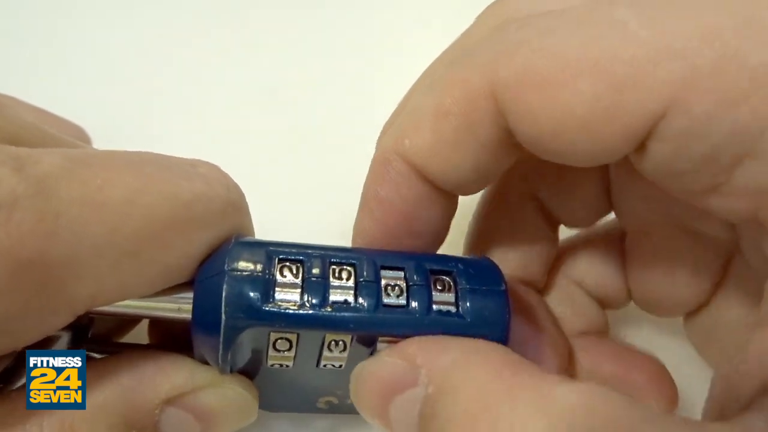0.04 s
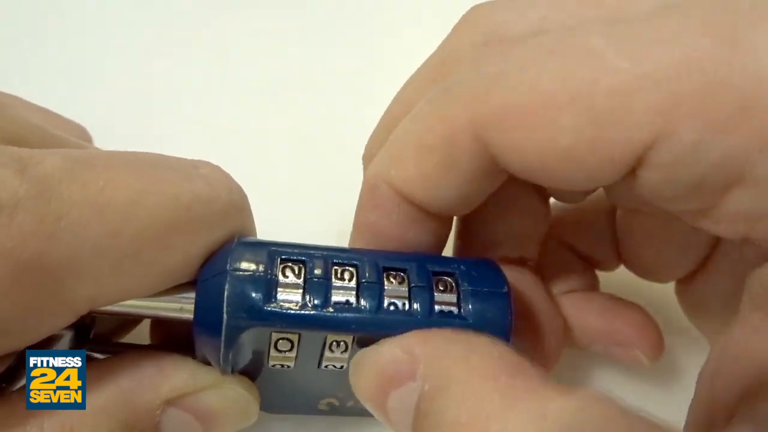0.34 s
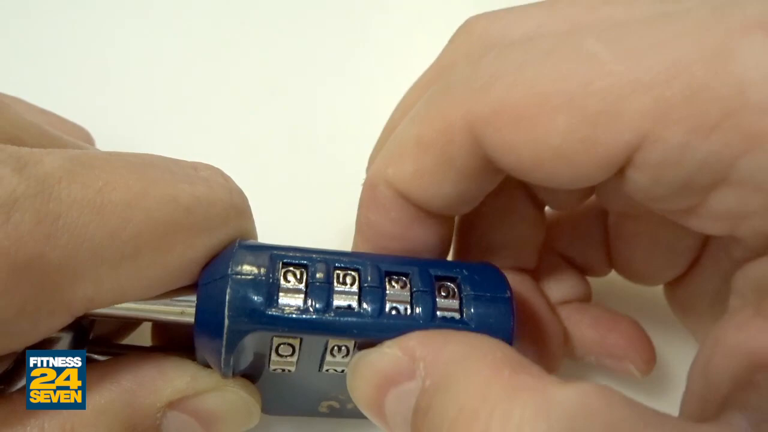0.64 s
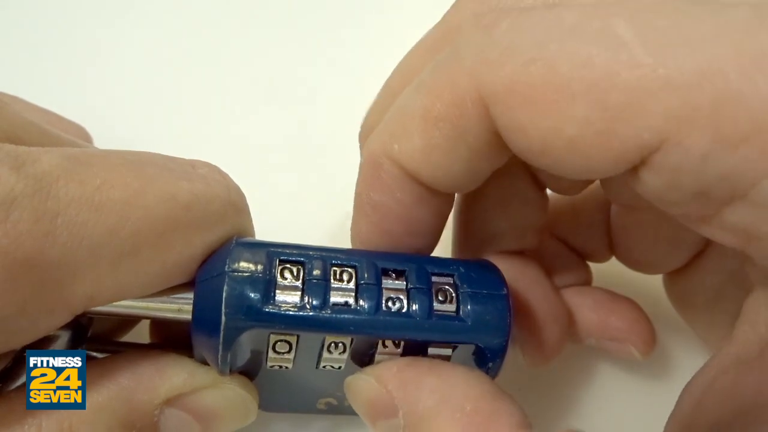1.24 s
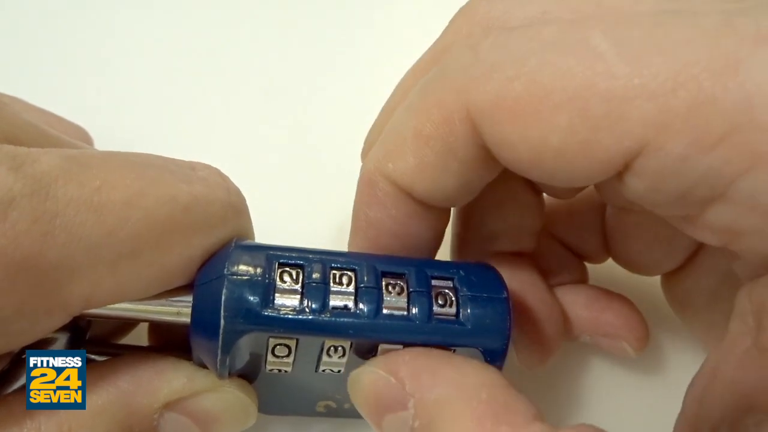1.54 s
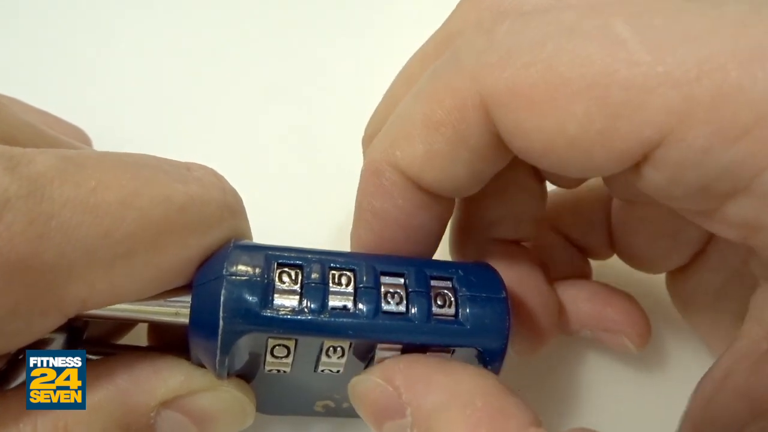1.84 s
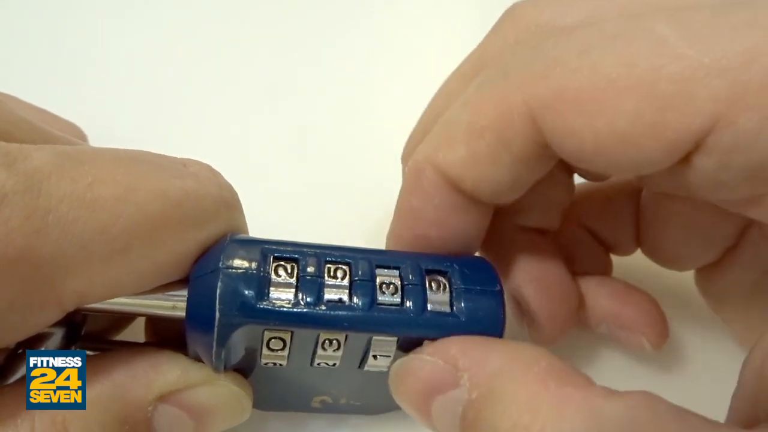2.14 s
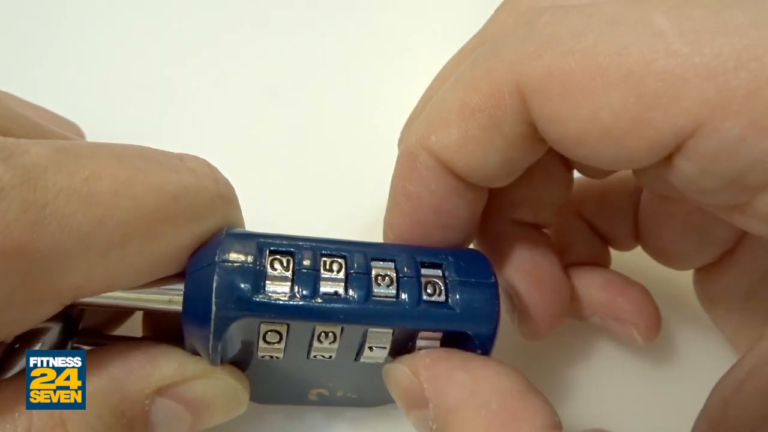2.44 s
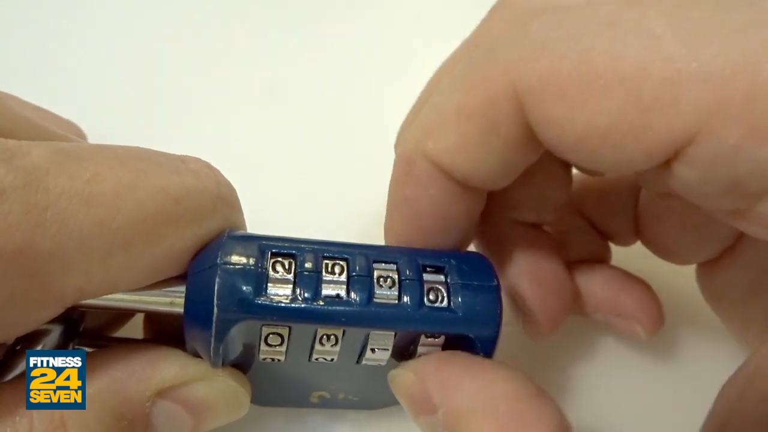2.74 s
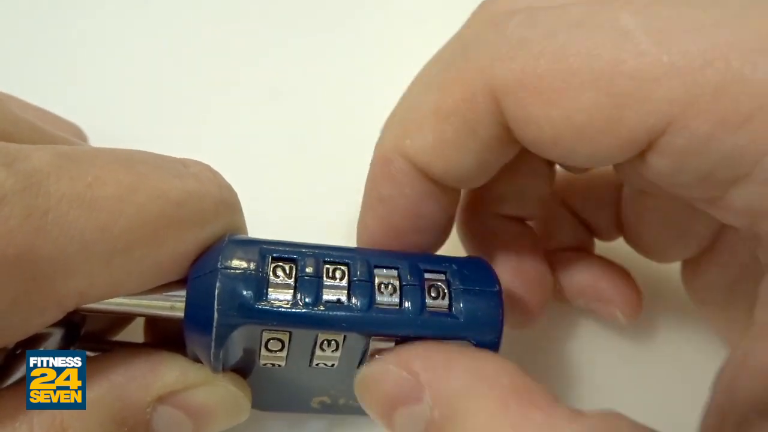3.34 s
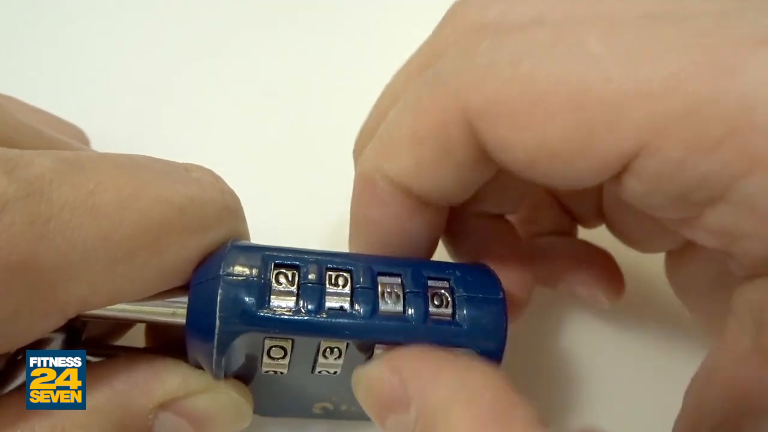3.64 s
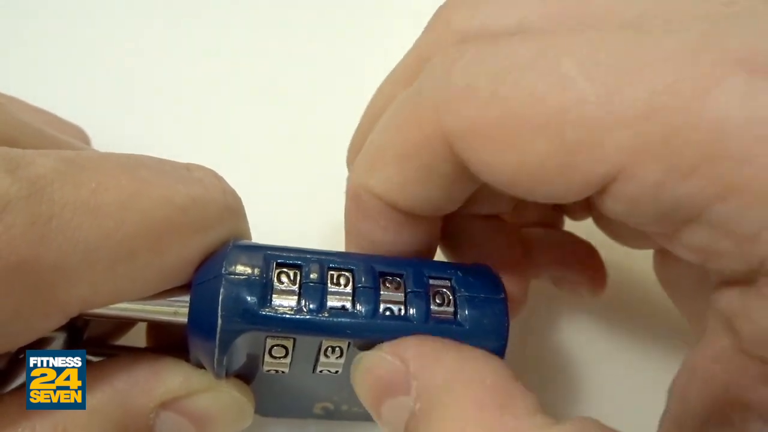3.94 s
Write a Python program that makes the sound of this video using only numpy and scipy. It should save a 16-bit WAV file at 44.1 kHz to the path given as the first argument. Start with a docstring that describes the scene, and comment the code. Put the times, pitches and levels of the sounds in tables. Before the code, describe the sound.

A small padlock's number wheels click sharply and irregularly over a quiet fan hum.

```python
"""In a small room with a quietly humming fan, a thumb turns the number wheels of a small padlock, close up.
The detent springs scrape and snap from notch to notch, each snap a short crack with a faint metal ring.
The firmer snaps knock the hand-damped lock body, and wheels and loose parts tap and ping as they touch.
A near wall answers with a dull slap, the room with a soft tail."""
import sys
import numpy as np
from scipy import signal
from scipy.fft import rfft, irfft, next_fast_len
from scipy.io import wavfile
from scipy.ndimage import map_coordinates

SR = 44100
rng = np.random.default_rng(int(sys.argv[2]) if len(sys.argv) > 2 else 0)


def int16_out(signal):
    """Quantize to a 16-bit WAV file."""
    q = np.round(np.clip(np.atleast_2d(signal).T, -1, 1) * 32767)
    wavfile.write(sys.argv[1], SR, q.astype(np.int16))


N = 176400
ATTACK_S = .0006  # onset time constant of every crack and ring

# The detent contacts. Each row: start in seconds, then the crack's relative level in dB in its
# mid, presence and top bands.
DETENT_SNAPS = [(0.0436, -61, -83, -52.5), (0.2698, -52.5, -72, -65), (0.4335, -60, -52, -65),
                (0.4553, -50.5, -66, -53), (0.4617, -49, -54, -50), (0.468, -45, -55, -41.5),
                (0.6242, -55, -54.5, -54), (0.6442, -54, -66, -57), (0.6634, -49.5, -61, -48),
                (0.6728, -44, -50, -44.5), (0.6781, -45, -52, -47.5), (0.82, -53, -57, -56),
                (0.8316, -47, -51, -46.5), (0.8374, -44.5, -49, -38), (1.0126, -56, -69, -49.5),
                (1.0289, -47.5, -52, -55), (1.0392, -47, -45, -42.5), (1.1928, -47, -44.5, -39.5),
                (1.2334, -54, -48, -48), (1.2340, -40.5, -37.5, -29.5), (1.237, -47.5, -55, -49),
                (1.3312, -49, -40.5, -39.5), (1.3510, -43.5, -43, -36.5), (1.3548, -63, -64, -33.5),
                (1.3614, -39.5, -59, -61), (1.367, -58, -56, -63), (1.3805, -45, -40, -45.5),
                (1.5678, -51.5, -57.5, -57), (1.7499, -53.5, -57, -52), (1.8372, -48.5, -56, -46),
                (1.9932, -64, -55, -44.5), (2.2162, -46.5, -46, -44), (2.379, -57, -54, -79),
                (2.3984, -41.5, -42.5, -41), (2.3996, -47, -47, -53), (2.583, -55, -56, -56),
                (2.599, -44, -50, -52), (2.6024, -45.5, -70, -48), (2.768, -36.5, -48, -45),
                (2.7705, -52, -56, -47), (2.812, -67, -50, -49), (2.821, -67, -46.5, -55),
                (2.8946, -53, -56, -76.0), (2.9192, -47.5, -45, -43), (2.922, -45.5, -62, -50.5),
                (2.9508, -46.5, -45, -44), (2.9607, -59, -73, -53), (3.1126, -54, -57, -70),
                (3.1476, -48, -65, -57), (3.1505, -46, -51, -46.5), (3.423, -56, -62, -67),
                (3.5316, -43.5, -46.5, -50), (3.6871, -52, -58, -66), (3.7139, -43, -52, -37.5),
                (3.7167, -43.5, -48, -43.5), (3.8754, -53, -65, -53), (3.9137, -46.5, -45, -42.5)]
# The lock body jolts as a wheel seats. Each row: start in seconds, relative level in dB, pitch in Hz.
BODY_KNOCKS = [(0.465, -38.5, 262), (0.6758, -41.5, 330), (0.708, -46.5, 207), (0.8379, -31, 378),
               (1.0262, -38.5, 316), (1.037, -42.5, 330), (1.188, -38, 290), (1.193, -34.5, 410),
               (1.2027, -35.5, 308), (1.2351, -36.5, 380), (1.3509, -36, 397), (1.3606, -33, 252),
               (1.8385, -46.5, 328), (1.9933, -42, 248), (2.218, -30.5, 293), (2.398, -30.5, 380),
               (2.6008, -39.5, 346), (2.7676, -29.5, 372), (2.8205, -38.5, 300.0), (2.9014, -40, 340),
               (2.9188, -39.5, 218), (2.9536, -39.5, 165), (3.0395, -38.5, 270), (3.148, -35, 297),
               (3.5318, -40.5, 270), (3.7145, -34.5, 324), (3.9251, -45, 261)]
# The dull colour of thumb friction. Each row: frequency in Hz, relative level in dB.
FRICTION_EQ = [(40, -26), (170, 4.5), (350, 4.5), (700, -13), (2200, -16.5), (4000, -40), (12000, -36)]


def amp(db):
    return 10 ** (np.asarray(db) / 20)


def unit_rms(x):
    return x / np.sqrt(np.mean(x ** 2) + 1e-20)


def curve_at(points, hz, column=1):
    """One column of a table read on a log frequency axis."""
    columns = np.transpose(points)
    return np.interp(np.log(hz + 1), np.log(columns[0] + 1), columns[column])


def fader(points):
    """Gain per sample from points of time in seconds and level in dB."""
    return amp(np.interp(np.arange(N) / SR, *np.transpose(points)))


def wobble(knots_per_s):
    """A smooth random curve."""
    return map_coordinates(rng.standard_normal(4096), [np.arange(N) * knots_per_s / SR], mode="wrap")


def filtered(x, response):
    """Shape x with a gain given as a function of frequency."""
    size = next_fast_len(N + SR // 2)
    return irfft(rfft(x, size) * response(np.fft.rfftfreq(size, 1 / SR)), size)[:N]


def noise(eq):
    """Coloured noise of rms 1."""
    return unit_rms(filtered(rng.standard_normal(N), lambda hz: amp(curve_at(eq, hz))))


def add(track, start_s, sound):
    """Mix a sound into the track."""
    part = track[max(round(start_s * SR), 0):][:len(sound)]
    part += sound[:len(part)]


def wavering_tone(hz, width_hz):
    """A tone of rms 1, unsteady in pitch and level."""
    drift = np.cumsum(wobble(2 * width_hz)) * width_hz / 2
    phase = 2 * np.pi * (hz * np.arange(N) + drift) / SR
    return unit_rms(amp(1.12 * wobble(width_hz)) * np.sin(phase))


def jolt(hz, cycles_to_crest):
    """A heavily damped swing whose envelope crests at 1."""
    t = np.arange(SR // 12) / SR
    rise = t * hz / cycles_to_crest
    return -rise * np.exp(1 - rise) * np.sin(2 * np.pi * hz * t)


def ring(hz, t60, drift_rad):
    """A dying tone, roughened by a phase that wanders about drift_rad as it fades."""
    t = np.arange(SR // 2) / SR
    drift = np.cumsum(rng.standard_normal(len(t))) * drift_rad / np.sqrt(t60 * SR)
    envelope = amp(-60 * t / t60) * (1 - np.exp(-t / ATTACK_S))
    return envelope * np.sin(2 * np.pi * hz * t + drift)


def burst(t60, lead_s):
    """A brief rough impact, starting lead_s into the array."""
    t = np.maximum(np.arange(SR // 25) / SR - lead_s, 0)
    spectrum = rfft(rng.standard_normal(len(t)) * (1 - np.exp(-t / ATTACK_S)) * amp(-60 * t / t60))
    return irfft(spectrum / (np.abs(spectrum) + 1e-12) ** .18)  # evens out peaks and dips a little


def fan():
    """The bed: steady moving air, a few humming tones and a low drone that swells and fades."""
    # Fan and room air. Each row: frequency in Hz, relative level in dB.
    air_eq = [(20, -20.5), (50, -16.5), (90, -11.5), (135, -10), (170, -9), (210, -3.5), (245, -9.5),
              (275, -1), (350, -11), (420, -15.5), (590, -19), (830, -18.5), (1000, -26), (1300, -28),
              (1650, -24.5), (2350, -23.5), (2700, -30.5), (6000, -33), (11000, -37)]
    # Fan tones and duct resonances. Each row: pitch in Hz, level in dB before the fader, width in Hz.
    hum_tones = [(374.2, -64, 18), (736, -74.5, 10), (791.4, -65.5, 6)]
    # The fader ride on those tones. Each row: time in seconds, gain in dB.
    hum_ride = [(0, -4), (.55, -0.5), (2.6, -0.5), (3.2, 2.5), (4, 2.5)]
    # The swells of the drone. Each row: time in seconds, rms level in dB.
    drone_ride = [(0, -60.5), (.2, -57), (.36, -48.5), (.41, -73), (0.518, -61), (.6, -69), (1.0, -58),
                  (1.5, -58), (2.4, -62), (2.7, -86), (3.3, -58.5), (4, -64)]
    hum = sum(amp(db) * wavering_tone(hz, width_hz) for hz, db, width_hz in hum_tones)
    air = amp(-56.5) * noise(air_eq)
    drone = fader(drone_ride) * wavering_tone(280.4, width_hz=12)
    return air + drone + fader(hum_ride) * hum


def room(x):
    """A dull slap from the near wall within a soft, diffuse room tail."""
    # The room's tail. Each row: frequency in Hz, level in dB, time to fall 60 dB in seconds.
    tail_bands = [(98, -12.5, 0.35), (332, -1.5, 0.53), (595, -10, 0.036), (1180, -9, 1),
                  (1870, -4.5, 0.19), (3500, -6, 0.72), (5900, -12, 0.36), (8200, -9.5, 0.49),
                  (12000, -12, 0.17)]
    slap_s, slap_cutoff_hz, predelay_s = .0137, 910, .006
    out = np.zeros(N)
    add(out, slap_s, amp(-9) * signal.lfilter(*signal.butter(1, slap_cutoff_hz, fs=SR), x))
    for piece in np.array_split(np.arange(N), 20):  # a fresh random tail every 0.2 s
        hz, t, hiss = signal.stft(rng.standard_normal(SR // 2), SR, nperseg=256)
        t60 = curve_at(tail_bands, hz, column=2)[:, None]
        decay = amp(curve_at(tail_bands, hz)[:, None] - 60 * t / t60)
        energy_trim = np.sqrt(2 * np.log(1000) / (t60 * SR))
        tail = signal.istft(hiss * decay * energy_trim, SR, nperseg=256)[1]
        add(out, piece[0] / SR + predelay_s, signal.fftconvolve(x[piece], tail))
    return out


def thumb_slide():
    """A soft, dull swell of skin sliding over to the next wheel."""
    crest_s, width_s = 3.34, 0.15
    swell = np.exp(-.5 * ((np.arange(N) / SR - crest_s) / width_s) ** 2)
    return amp(-58.5) * swell * noise(FRICTION_EQ)


def notch_scrapes():
    """The thumb's grainy rub swells as the spring climbs out of its notch, just before the wheel seats."""
    climb_s = 0.02
    swell = amp(-51) * np.linspace(0, 1, int(climb_s * SR))
    force = np.zeros(N)
    for start, _, _ in BODY_KNOCKS:
        add(force, start - climb_s, swell)
    return force * unit_rms(noise(FRICTION_EQ) * amp(2 * wobble(600)))


def contact_grit():
    """Tiny slips crowd around each detent contact in a bright, gritty fuzz."""
    # The colour of the grit. Each row: frequency in Hz, relative level in dB.
    grit_eq = [(300, -40), (1500, -15), (4000, -14), (7500, -13), (12000, -10)]
    t = np.arange(-SR // 50, SR // 50) / SR
    spike = np.exp(-np.abs(t) / 0.0045)
    force = np.zeros(N)
    for start, *band_dbs in DETENT_SNAPS:
        add(force, start + t[0], amp(np.mean(band_dbs) - 8.5) * spike)
    return force * unit_rms(noise(grit_eq) * amp(8 * wobble(1700)))


def body_knocks():
    """The lock body swings about twice; the hand under it gives with a lower thud."""
    # The thumb's push thuds through the hand as a wheel gives. Each row: start in seconds, level in dB.
    hand_thuds = [(0.467, -58), (0.678, -45), (0.836, -47), (1.04, -45), (1.19, -53), (1.232, -46.5),
                  (1.327, -46.5), (1.362, -47.5), (2.821, -53), (2.956, -56), (3.533, -50.5), (3.918, -44)]
    out = np.zeros(N)
    for start, db, hz in BODY_KNOCKS:
        add(out, start, amp(db + 1.5) * jolt(hz, cycles_to_crest=0.48))
    for start, db in hand_thuds:
        add(out, start, amp(db) * jolt(hz=109.8, cycles_to_crest=0.65))
    return out


def part_taps():
    """Wheels and loose parts touch, and each rings with one slightly rough tone."""
    # Hollow taps to bright pings. Each row: start in seconds, level in dB, pitch in Hz,
    # time to fall 60 dB in seconds.
    taps = [(0.4682, -27, 7700, 0.007), (0.6442, -39, 8900, 0.0085), (.7098, -37.5, 2100, 0.011),
            (0.8378, -24.5, 7700, 0.01), (0.837, -40, 640, 0.013), (1.2072, -30, 970, 0.02),
            (1.2078, -40.5, 1950, 0.015), (1.34, -38.5, 2030, 0.01), (1.3575, -34, 1620, 0.013),
            (1.3617, -22.5, 1900, 0.0077), (1.3619, -35, 2750, 0.0052), (1.75, -74, 3354, 1.8),
            (1.9933, -39.5, 7950, .009), (1.9935, -36.5, 8800, 0.01), (2.768, -27.5, 6250, 0.0079),
            (3.0398, -37.5, 640, 0.017), (3.9137, -44.5, 3360, 0.016)]
    out = np.zeros(N)
    for start, db, hz, t60 in taps:
        add(out, start, amp(db) * ring(hz, t60, drift_rad=1.6))
    return out


def wheel_resonance(x):
    """The wheel adds its bright resonance to every snap."""
    return x + amp(-1) * signal.lfilter(*signal.iirpeak(7670, Q=10, fs=SR), x)


def detent_snaps():
    """The spring snaps into a notch: a crack of a few milliseconds and a faint metallic ring."""
    # The crack's mid, presence and top bands. Each row: low edge in Hz, high edge in Hz,
    # time to fall 60 dB in seconds.
    crack_bands = [(810, 4610, 0.015), (4730, 6460, 0.0035), (6000, 12400, 0.011)]
    # The ring of wheels and springs. Each row: pitch in Hz, level in dB relative to the snap's
    # top-band setting, time to fall 60 dB in seconds.
    metal_modes = [(5700, -33, 0.068), (6000, -37, 0.073), (7670, -26, 0.072), (8350, -32, 0.12),
                   (10900, -35, 0.091)]
    lead_s, span_s = .008, .0032  # a crack carries the energy of its level held for span_s
    bandpasses = [(signal.butter(3, [low, high], "band", fs=SR, output="sos"), t60)
                  for low, high, t60 in crack_bands]
    out = np.zeros(N)
    for start, *band_dbs in DETENT_SNAPS:
        for db, (bandpass, t60) in zip(band_dbs, bandpasses):
            crack = signal.sosfilt(bandpass, burst(t60, lead_s))
            crack *= np.sqrt(span_s * SR) / np.linalg.norm(crack)
            add(out, start - lead_s, amp(db - 5) * crack)
        for hz, db, t60 in metal_modes:
            ring_db = band_dbs[-1] + db + rng.normal(0, 2)
            add(out, start, amp(ring_db) * ring(hz, t60, drift_rad=7))
    return out


def scene():
    """The lock in its room, over the fan, in mono."""
    snaps = wheel_resonance(detent_snaps())
    lock = snaps + contact_grit() + body_knocks() + notch_scrapes() + thumb_slide()
    taps = part_taps()
    room_send = lock + amp(-6) * taps  # the hands shield the ringing parts from the room
    return (lock + taps + room(room_send) + fan())[None]


def record(dry):
    """A brick-wall high cut takes off the top of the treble."""
    cutoff_hz = 11100
    return np.array([filtered(x, lambda hz: 1 / np.sqrt(1 + (hz / cutoff_hz) ** 160)) for x in dry])


dry = scene()
out = record(dry)
int16_out(out)
```